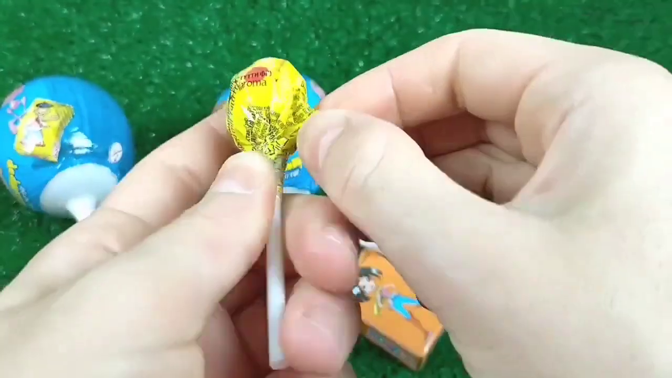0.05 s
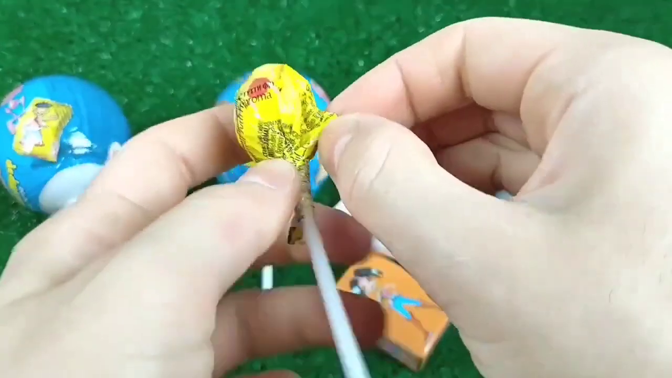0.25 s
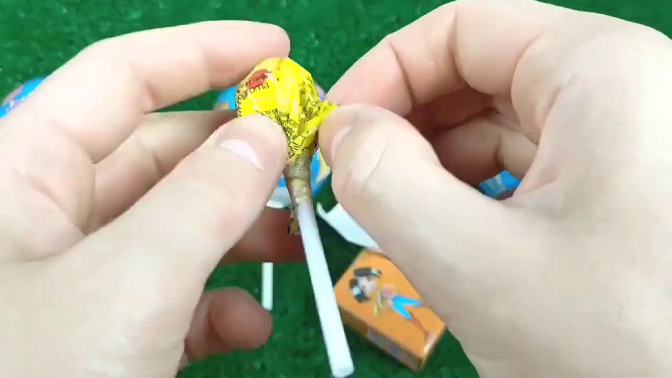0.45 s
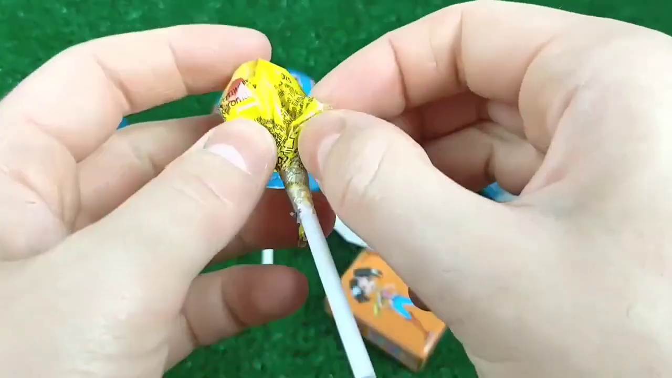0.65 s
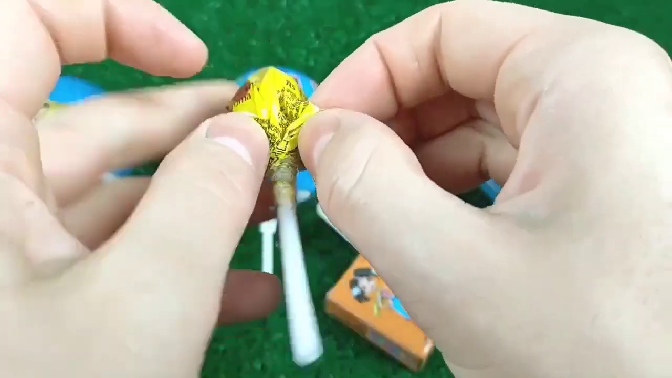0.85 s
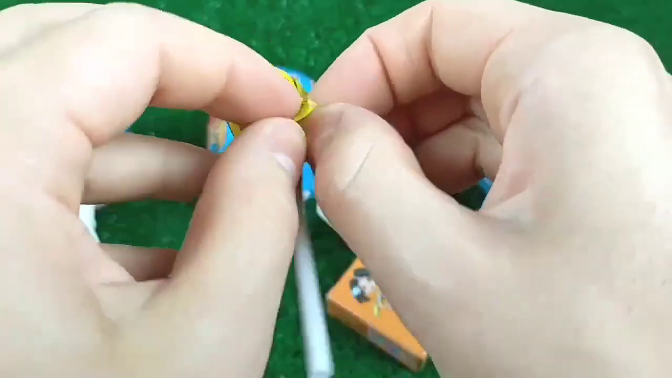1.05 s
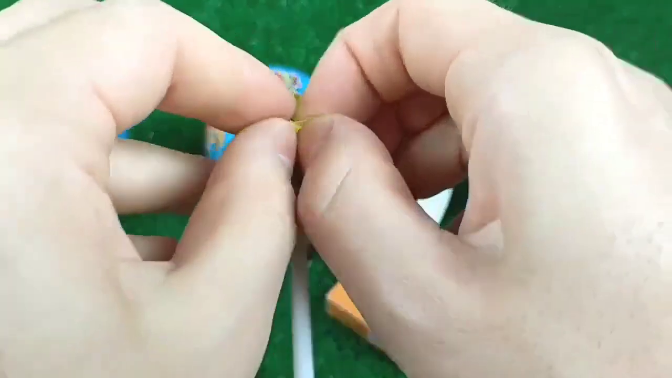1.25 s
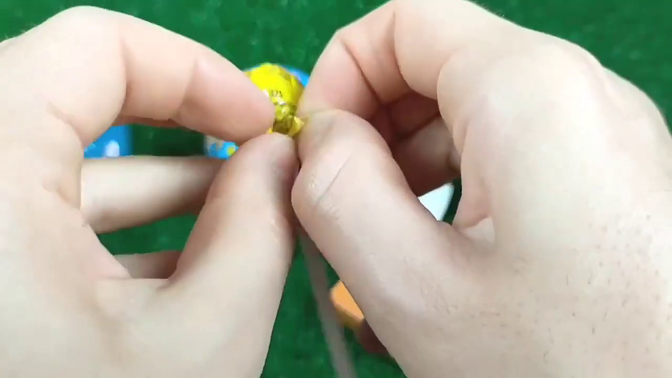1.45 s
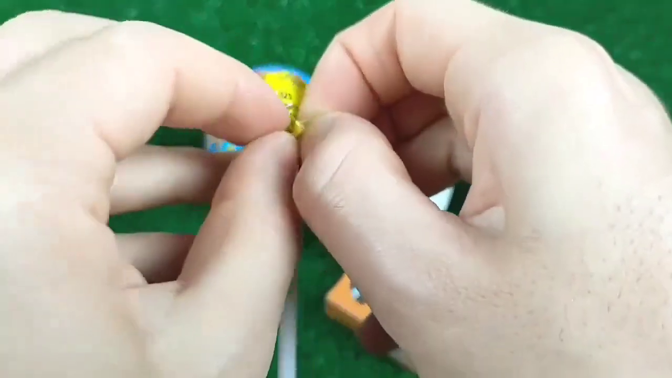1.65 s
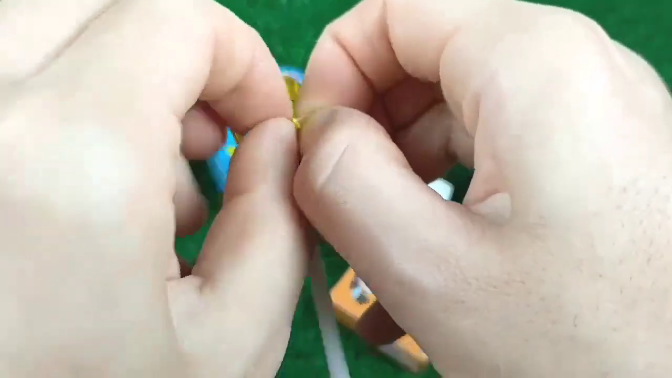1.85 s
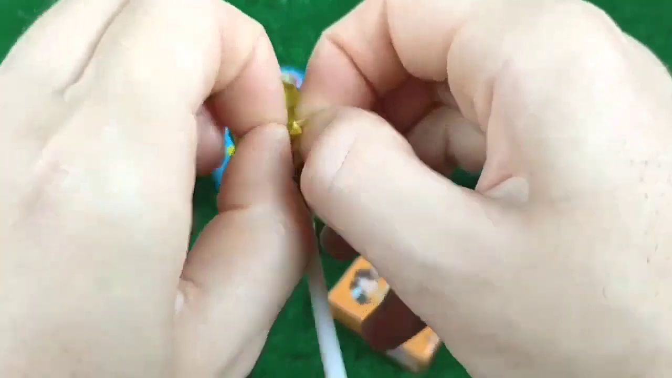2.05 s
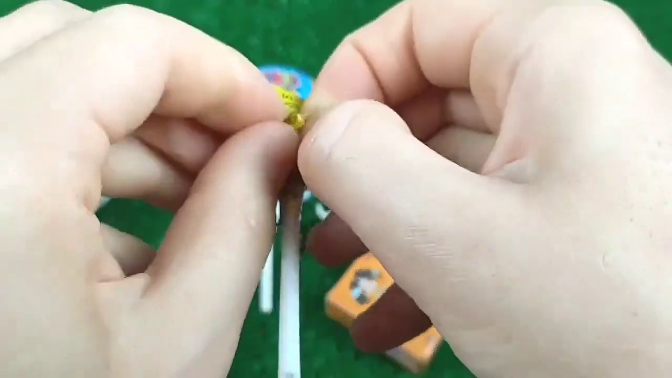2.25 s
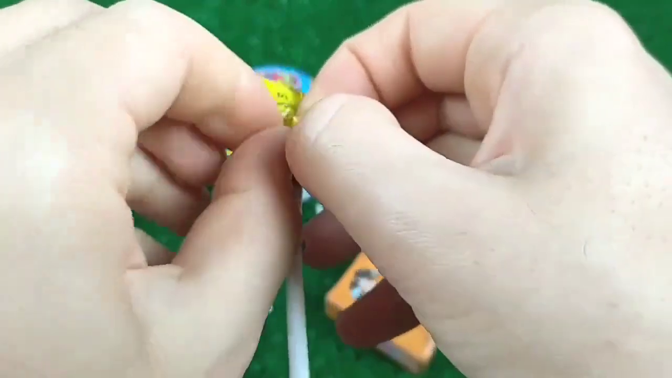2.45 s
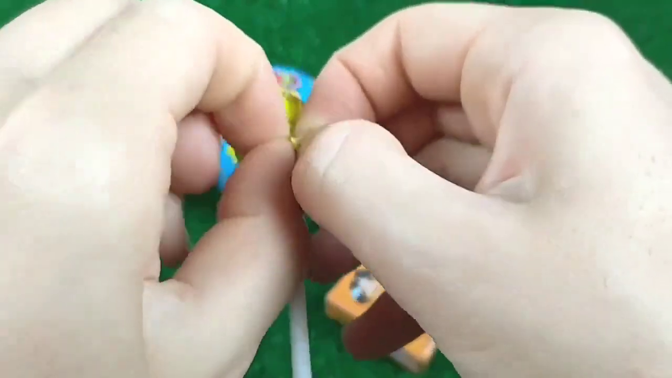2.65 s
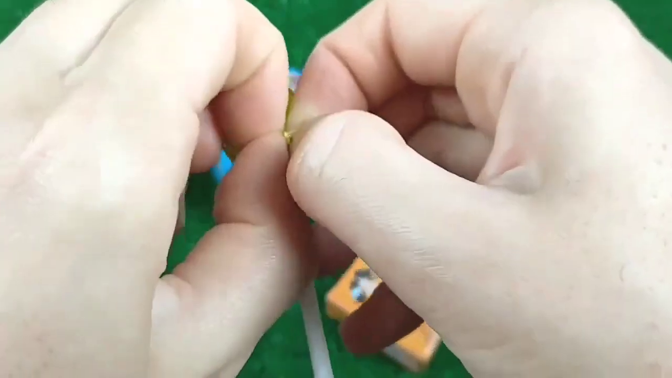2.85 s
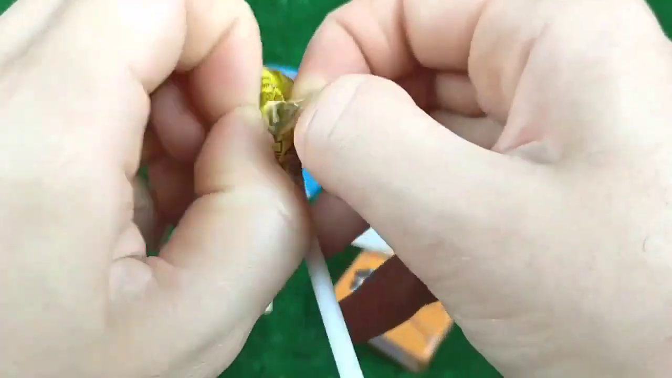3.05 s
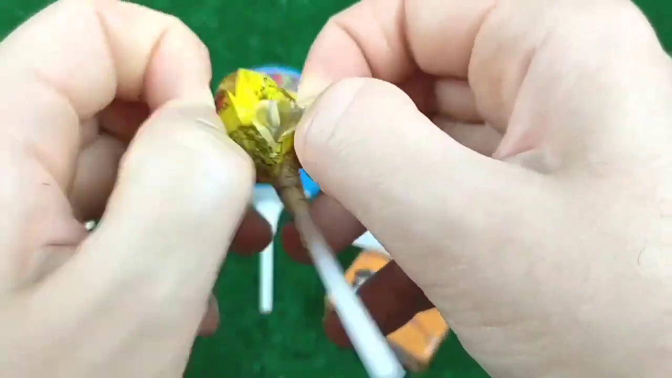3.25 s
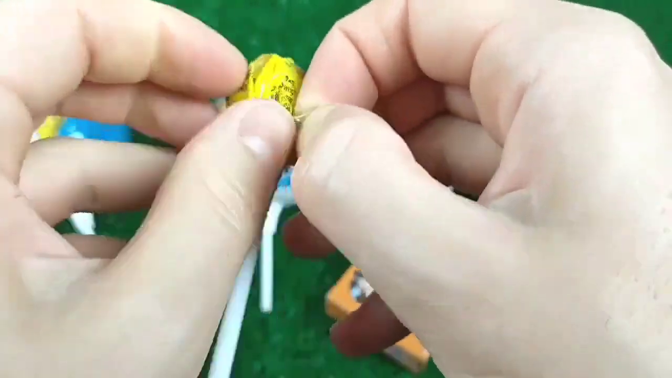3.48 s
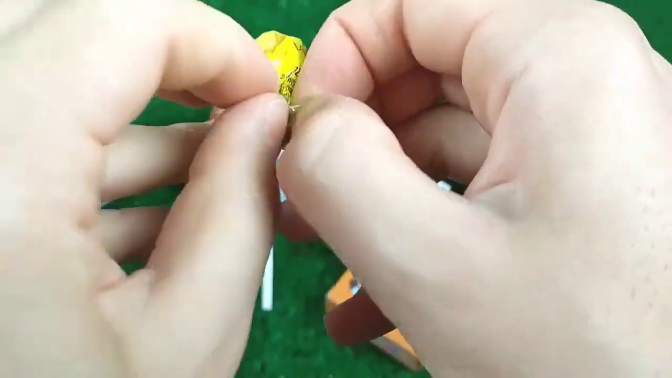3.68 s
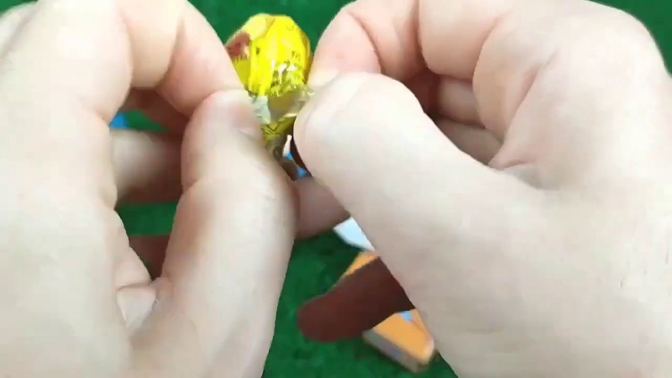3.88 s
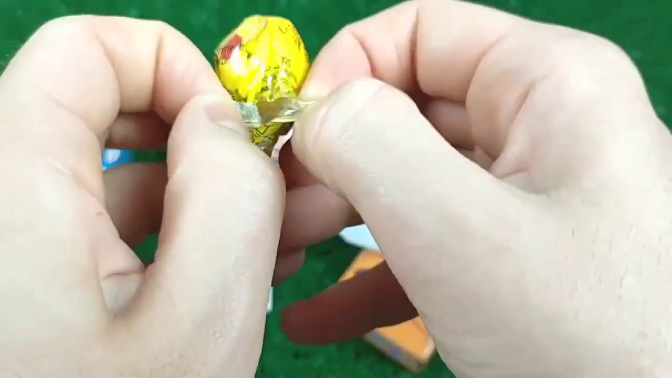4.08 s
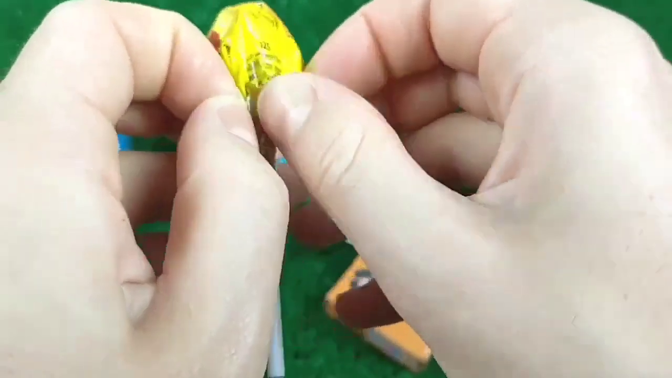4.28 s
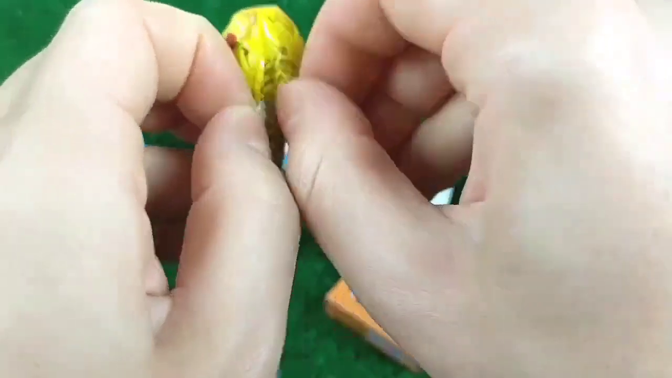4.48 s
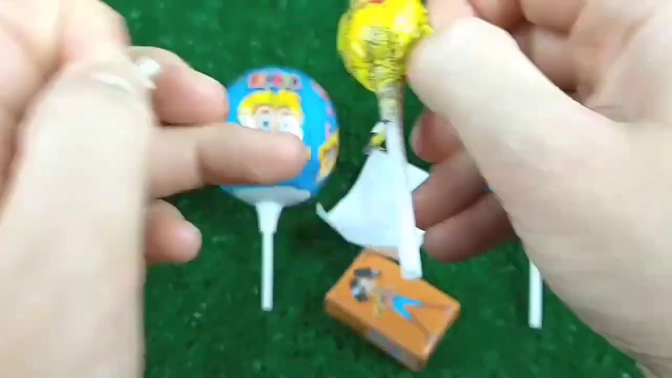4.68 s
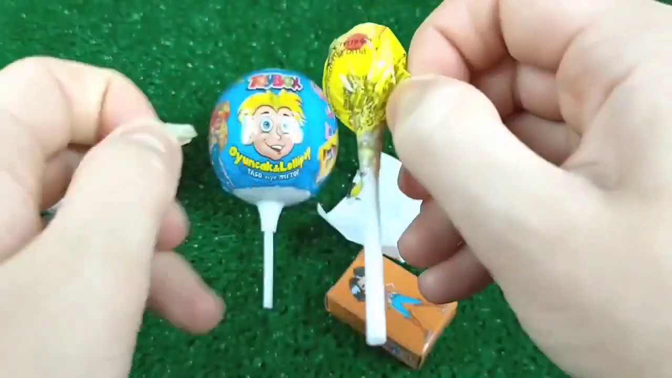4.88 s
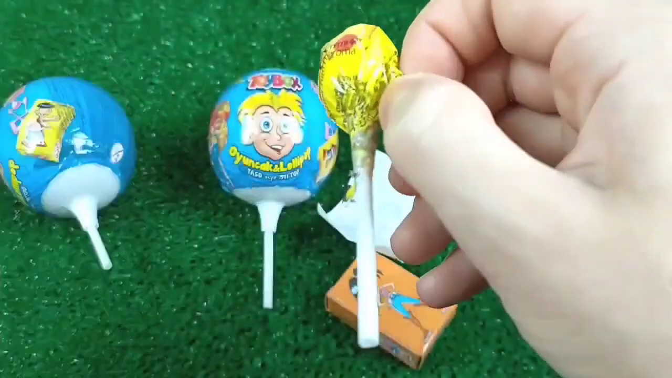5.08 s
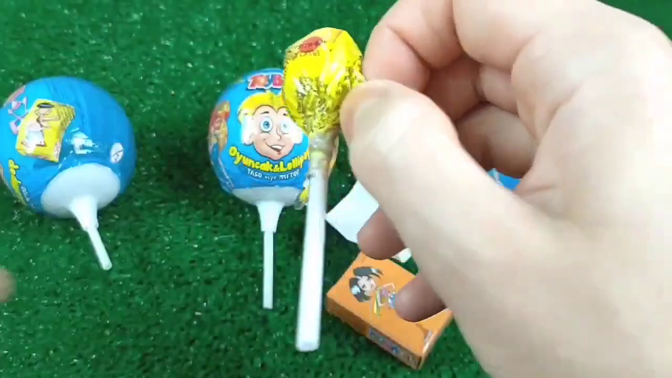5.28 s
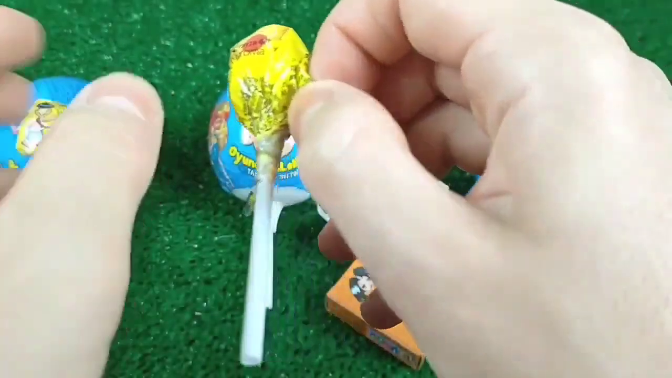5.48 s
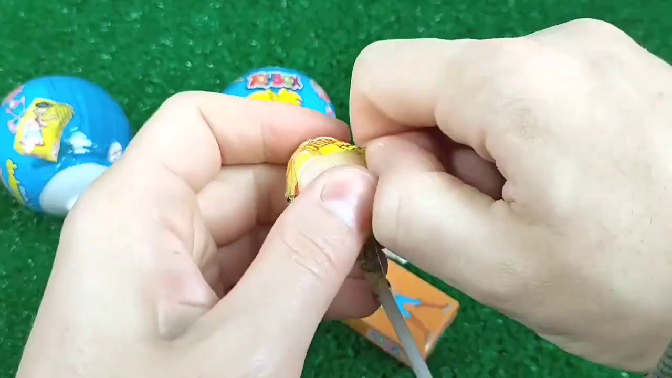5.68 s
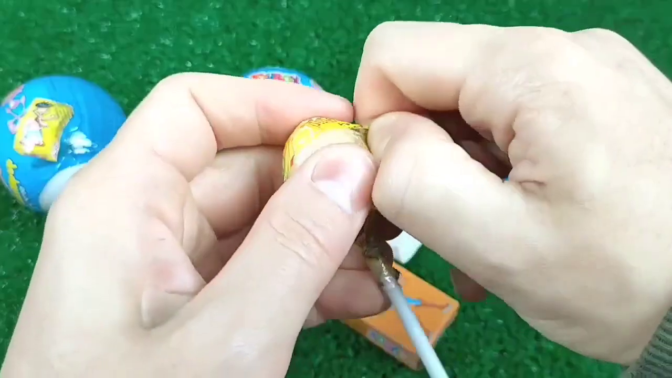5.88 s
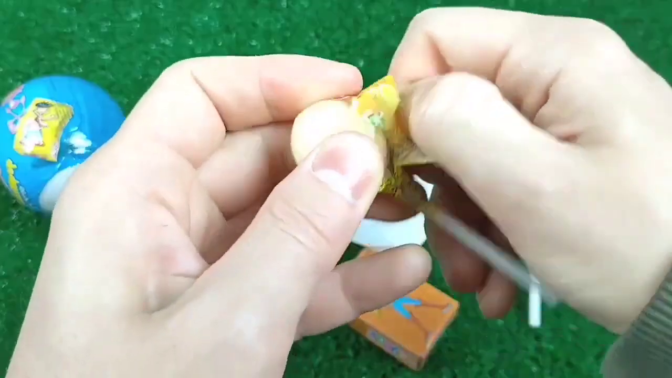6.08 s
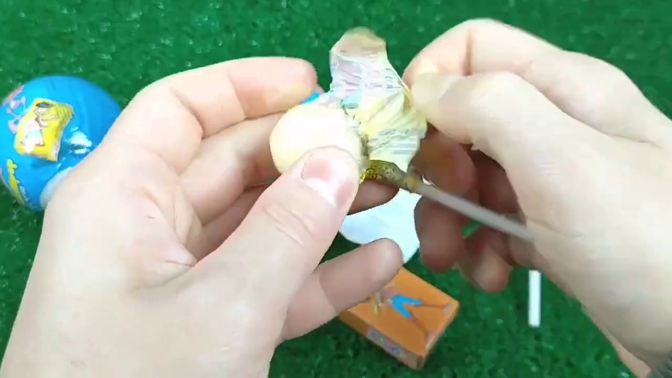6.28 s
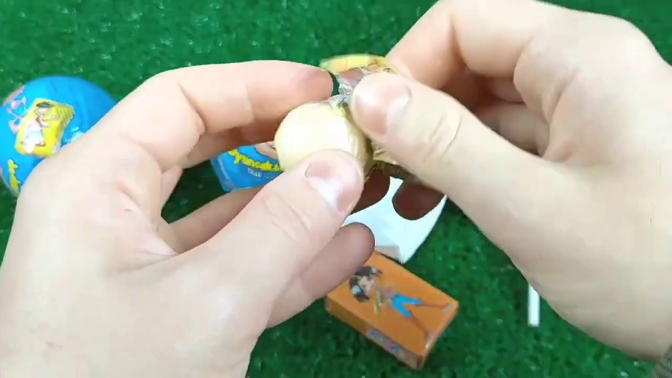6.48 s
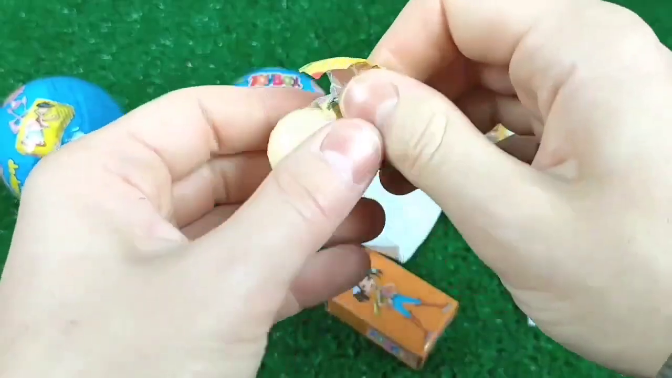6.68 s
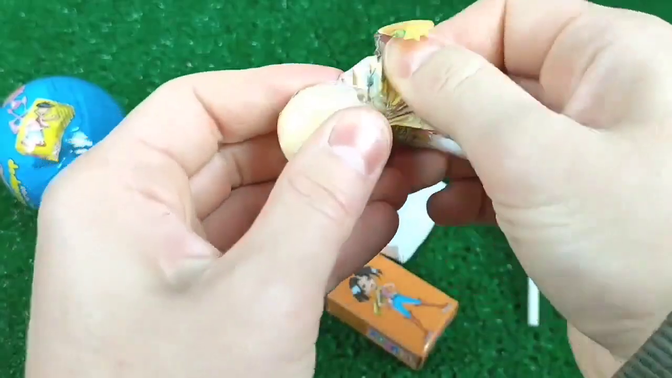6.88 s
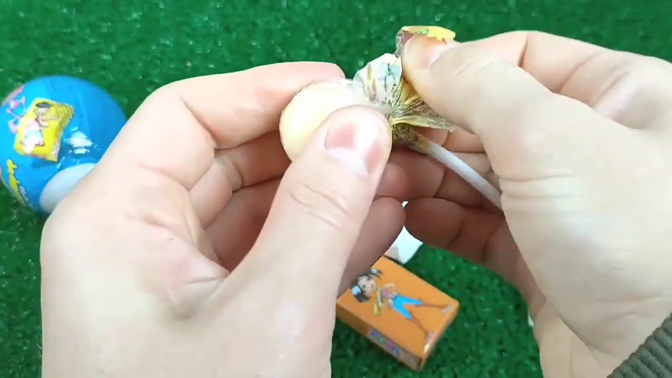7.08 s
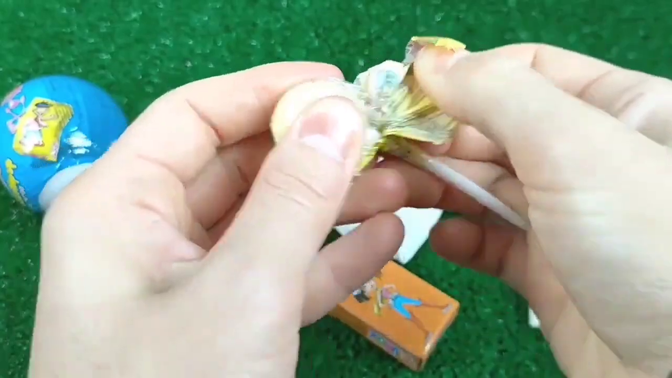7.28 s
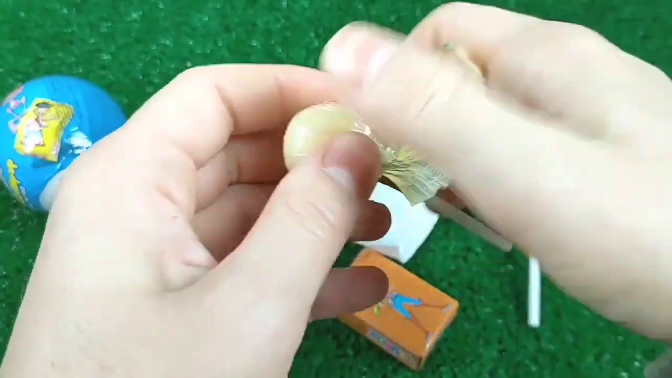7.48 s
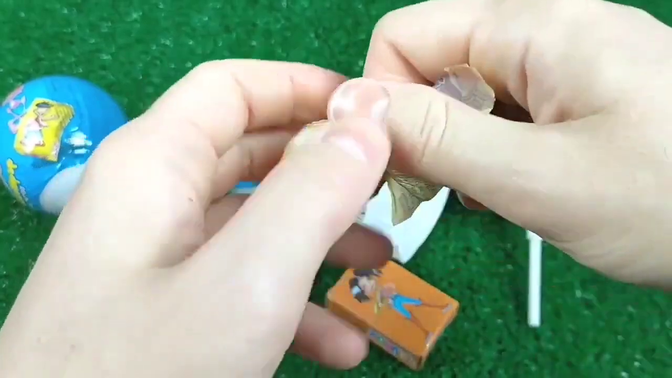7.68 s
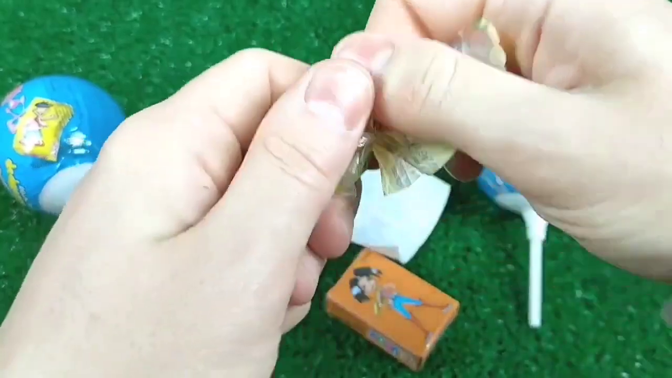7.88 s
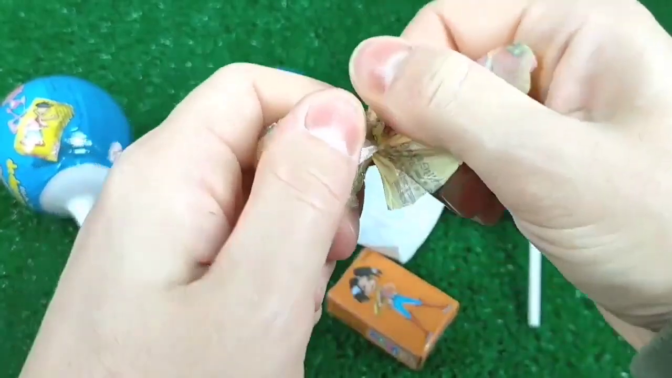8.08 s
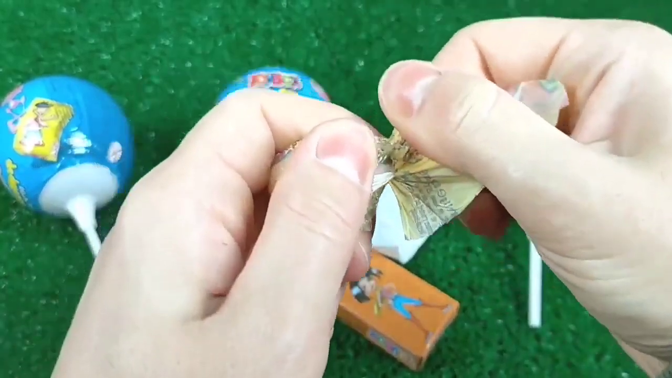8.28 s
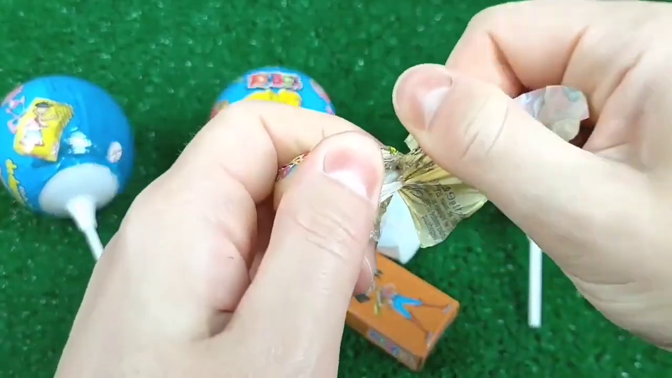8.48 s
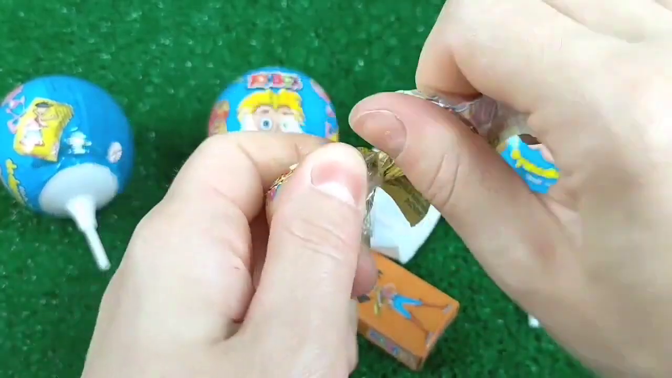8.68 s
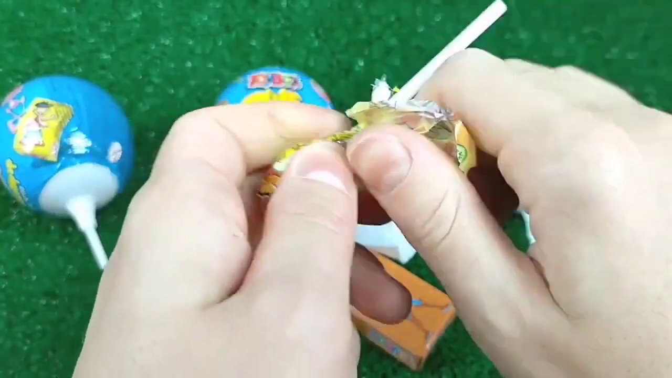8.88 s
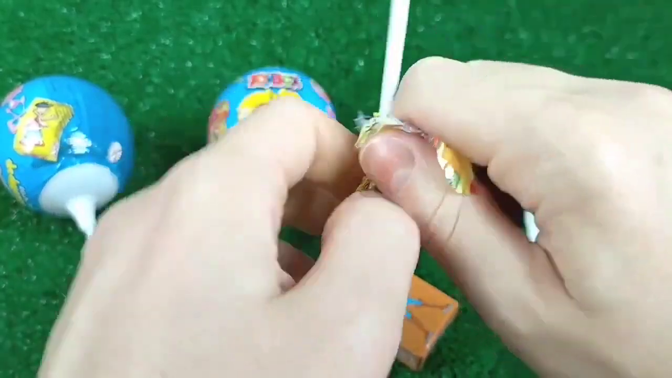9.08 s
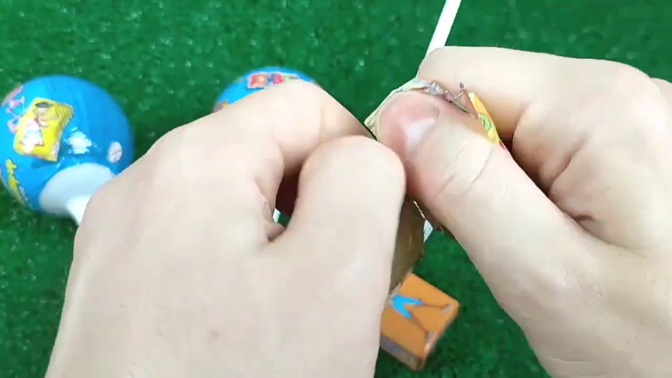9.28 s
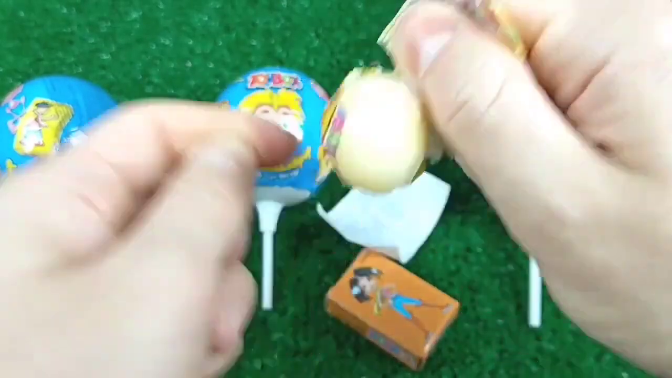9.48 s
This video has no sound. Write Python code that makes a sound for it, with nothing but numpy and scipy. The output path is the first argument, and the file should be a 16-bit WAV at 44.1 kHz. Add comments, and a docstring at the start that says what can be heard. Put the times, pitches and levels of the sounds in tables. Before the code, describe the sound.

Close to a phone microphone in a small quiet room, fingers twist and pick at a lollipop's plastic wrapper. Faint crackle and soft skin rubbing come first, with scattered dry snaps. A few hard pops break out, a near-quiet pause follows, then the film opens and crackles densely, bright and crisp, right to the end.

```python
"""A burst of fine crackle over a dull skin rub and faint room noise, then sparse snaps, dense once the film opens.
Two hands twist, pick at and peel the plastic wrapper off a lollipop, close to a phone in a small, quiet room.
Each crease is a short grain: brief noisy rise, sharp step, film rattle shaped by a facet resonance, low body.
Finger strokes swell the level of the small grains; skin rubs (coloured noise) and squeaks (wavering sines).
The hardest pops thud (decaying sines) and puff air (high-passed pushes); decaying noise bands echo the room."""
import sys
import numpy as np
from scipy import signal
from scipy.fft import rfft, irfft, next_fast_len
from scipy.io import wavfile

SR = 44100
rng = np.random.default_rng(int(sys.argv[2]) if len(sys.argv) > 2 else 0)


def log_audio(samples):
    """Write samples as a 16-bit WAV file to the path given in sys.argv[1]."""
    # one column per channel
    frames = np.atleast_2d(samples).T
    # limit to full scale, then quantise
    limited = np.clip(frames, -1, 1)
    pcm = np.round(limited * 32767).astype(np.int16)
    wavfile.write(sys.argv[1], SR, pcm)


N = 420713
TIME = np.arange(N) / SR
GRAIN, LEAD = 512, 96  # samples in a grain, samples of it before the snap


def undb(db):
    """Decibels to gain."""
    return 10 ** (np.asarray(db) / 20)


def curve(rows):
    """Gain at every sample from (t/s, level/dB) rows."""
    return undb(np.interp(TIME, *np.transpose(rows)))


def colour(points, size):
    """Gain of an (f/Hz, level/dB) spectrum on FFT bins, interpolated over log f."""
    hz, db = np.transpose(points)
    log_hz = np.log(np.fft.rfftfreq(size, 1 / SR) + 1)
    return undb(np.interp(log_hz, np.log(hz), db))


def unit(x):
    """Scale every row to unit energy."""
    return x / np.sqrt(np.sum(x ** 2, axis=-1, keepdims=True))


def causal(gain):
    """Minimum-phase spectrum: the response starts at once, then dies away."""
    cepstrum = irfft(np.log(gain))
    cepstrum[..., 1:GRAIN // 2] *= 2
    cepstrum[..., GRAIN // 2 + 1:] = 0
    return np.exp(rfft(cepstrum))


def walk(rate_hz):
    """Smooth random drift with a spread near 1, rate_hz knots per second."""
    knots = rng.standard_normal(4096)
    return np.interp(TIME * rate_hz, np.arange(len(knots)), knots)


def noise(points, shared, pan_db):
    """Coloured stereo noise of rms 1, partly common to both channels."""
    size = next_fast_len(N)
    white = rng.standard_normal((3, size))
    spectrum = rfft(white[:2] + shared * white[2]) * colour(points, size)
    x = irfft(spectrum, size)[:, :N] * undb([[pan_db / 2], [-pan_db / 2]])
    return x / x.std()


# quiet room spectrum: f/Hz, relative level/dB per Hz
QUIET_SPECTRUM = [(20, 6), (60, 5.5), (200, -18.5), (500, -24.5), (1500, -29.5), (5000, -17), (7500, -38),
                  (15000, -46.5)]


def quiet_room(rms_db=-66.5):
    """Steady coloured noise stands for the room at rest."""
    return undb(rms_db) * noise(QUIET_SPECTRUM, shared=0.48, pan_db=4.5)


# film spectrum: f/Hz, relative level/dB per Hz
FILM_SPECTRUM = [(300, -18.5), (1400, -1), (1900, -1.5), (2800, -5.5), (3900, -2), (5500, -1.5),
                 (7000, -3.5), (8200, -7), (10500, -3), (14000, -6.5), (15500, -6.5)]


def buckle(facet_hz, body_db, treble_db, body_hz=1000, body_low_hz=170):
    """One stereo grain per crease: a brief noisy rise, a sharp step, then a facet rattle; taut film also knocks."""
    treble_hz, treble_spread_db = 8000, 1.5
    rise, rise_s, rattle_s, rattle_spread = 0.49, 0.0033, 0.0016, 0.32
    sharpness, ring, ring_width, ring_above, ring_octaves = 1.535, 2.03, 0.063, 1.386, 0.54
    count = len(facet_hz)
    t = (np.arange(GRAIN) - LEAD) / SR
    hz = np.fft.rfftfreq(GRAIN, 1 / SR) + 10
    chance = rng.standard_normal((count, 3, GRAIN + 1))
    own = chance[:, :, :1]  # per-crease draws: rattle length, lag, note

    # folds face different ways: each microphone port hears its own mix
    folds = chance[:, :1, 1:] + chance[:, 1:, 1:]
    before = rise * unit(folds * (t < 0) * np.exp(-np.abs(t) / rise_s))
    decay_s = rattle_s * np.exp(rattle_spread * own[:, :1])
    after = unit(folds * (t > 0) * np.exp(-np.abs(t) / decay_s))
    step = -1. * (t == 0)

    # weak below the facet resonance, gentle fade above it
    ratio = hz / facet_hz[:, None]
    facet = ratio ** 2 / np.hypot(1 - ratio ** 2, ratio / sharpness) / np.hypot(1, ratio)
    # a neighbouring facet of chance size rings along
    note = ring_above * 2 ** (ring_octaves * own[:, 2])
    facet = facet * np.hypot(1, ring / np.hypot(1, (ratio / note - 1) / ring_width))
    # some folds break more crisply
    crisp_db = treble_db + treble_spread_db * rng.standard_normal(count)
    facet = facet * undb(crisp_db[:, None] / (1 + (treble_hz / hz) ** 4))
    film = causal(colour(FILM_SPECTRUM, GRAIN) * facet)[:, None]
    crack = unit(irfft(rfft(before + step + after) * film))

    body = hz / np.hypot(hz, body_low_hz) / np.hypot(1, (hz / body_hz) ** 2)
    knock = unit(irfft(rfft(step + after) * causal(body)))
    grains = crack + undb(body_db)[:, None, None] * knock * undb([[1.5], [-2.5]])
    # right port hears it some samples later
    lag = np.clip(6.5 + .9 * own[:, 1], 0, None)
    grains[:, 1] = irfft(rfft(grains[:, 1]) * np.exp(-2j * np.pi * hz * lag / SR))
    return grains


# where the wrapper is worked between the two ports: t/s, left minus right level/dB
SIDE = [(0, 11), (2, 5.5), (4.8, 6.5), (5.8, 4.5), (6.3, 0.5), (7.2, 7.5), (8.6, 2), (9.5, 2)]


def side_db(times, spread_db, chance):
    """Pan of creases: the working place plus a random spread."""
    return np.interp(times, *np.transpose(SIDE)) + spread_db * chance


def place(times, grains, pan_db):
    """Sum panned stereo grains on the time line."""
    first = np.clip(times * SR - LEAD, 0, N).astype(int)
    where = (first[:, None] + np.arange(GRAIN)).ravel()
    sides = np.sqrt(2) * unit(undb(np.outer(pan_db, [.5, -.5])))
    channels = [np.bincount(where, (grains[:, c] * sides[:, c, None]).ravel(), N)[:N] for c in range(2)]
    return np.array(channels)


# finger strokes; a tight twist has small, high facets, open film large, low, hollow ones:
# start t/s, length/s, fine crackle level/dB, facet resonance f/Hz, low body level/dB re crack
STROKES_ON_FILM = [(0, 0.0075, -39.5, 4800, -18), (0.38, 0.021, -53.5, 3540, -28),
                   (0.453, 0.11, -57.5, 3330, -12.5), (0.668, 0.022, -62.5, 3370, -11),
                   (1.054, 0.32, -57, 4100, -32), (1.277, 0.022, -47, 4000, -40),
                   (1.462, 0.012, -40, 4060, -39), (1.53, .18, -57.5, 4140, -17),
                   (1.888, 0.22, -56.5, 4620, -37), (2.32, 0.12, -61, 3970, -15),
                   (2.795, 0.068, -63, 3420, -14.5), (3.005, 0.49, -57, 4460, -20),
                   (3.32, 0.027, -39, 3400, -28), (3.444, 0.0083, -32, 3260, -27),
                   (3.615, 0.29, -52.5, 3870, -26), (3.966, 0.23, -50, 4250, -18),
                   (4.047, 0.018, -37, 3270, -47), (4.261, 0.17, -50, 4240, -37),
                   (4.656, 0.14, -51, 4200, -25), (4.759, 0.093, -42, 3470, -22.5),
                   (5.113, 0.015, -64, 3780, -18), (5.274, 0.018, -66, 3500, -25),
                   (5.66, 0.022, -51.5, 3450, -27), (5.699, 0.25, -55.5, 4570, -27),
                   (6.003, .12, -55.5, 4360, -27), (6.163, 0.035, -29.5, 4700, -18),
                   (6.28, 0.026, -38, 5700, -38), (6.315, 0.027, -24, 2930, -21),
                   (6.472, 0.084, -38.5, 2650, -12), (6.659, 0.033, -35, 2160, -9),
                   (6.862, 0.11, -47.5, 3250, -20), (6.989, 0.04, -21, 3830, -32.5),
                   (7.057, 0.086, -28, 3560, -33), (7.08, 0.027, -31.5, 2000, 7),
                   (7.207, 0.085, -39.5, 2680, -26), (7.453, 0.071, -35.5, 3550, -33),
                   (7.578, 0.028, -29.5, 2050, -10), (7.66, .09, -47, 3400, -16),
                   (7.758, 0.052, -32, 2860, -17), (7.815, .2, -45, 3500, -31),
                   (8.029, 0.13, -30.5, 4000, -42), (8.054, 0.03, -30.5, 2000, -2),
                   (8.165, 0.037, -34.5, 3800, -47), (8.312, 0.32, -45, 3560, -27),
                   (8.563, 0.055, -35, 3330, -25), (8.714, 0.76, -44, 3530, -21),
                   (8.935, .05, -38, 3580, -25), (9.007, 0.013, -27.5, 2340, -11.5),
                   (9.077, 0.13, -36.5, 2340, -21), (9.32, .12, -47, 3800, -30),
                   (9.5, 0.069, -27, 3430, -37)]


def crumple(t):
    """Strokes swell, hold and die away: gain, facet Hz and body dB at times t, weighted by stroke power."""
    attack_s, release_s, held_db = 0.011, 0.02, -79.5  # film held still ticks faintly
    start, length, db, hz, body_db = np.transpose(STROKES_ON_FILM)[:, :, None]
    fade = np.maximum(start - t, 0) / attack_s + np.maximum(t - start - length, 0) / release_s
    power = (undb(db) * np.exp(-fade)) ** 2 + 1e-20
    total = power.sum(axis=0)
    share = power / total
    gain = np.sqrt(total + undb(held_db) ** 2)
    return gain, (share * hz).sum(axis=0), (share * body_db).sum(axis=0)


def crackle(count=3200):
    """Small creases give way in flurries, scaled by the force crumpling the film."""
    spread_db, flurry_db, octaves, body_spread_db = 7.5, 3.5, 0.4, 5
    size, pitch, body, pan = rng.standard_normal((count, 4)).T
    times = (np.arange(count) + rng.uniform(-2, 2, count)) / count * N / SR
    flurry = np.interp(times, TIME, walk(rate_hz=60))
    sizes = undb(spread_db * np.minimum(size, 1.5) + flurry_db * flurry)
    sizes *= np.sqrt(N / np.sum(sizes ** 2))
    force, usual_hz, hollow_db = crumple(times)
    facet_hz = usual_hz * 2 ** (octaves * pitch)
    body_db = hollow_db + body_spread_db * body
    grains = buckle(facet_hz, body_db, treble_db=np.zeros(count), body_hz=1200, body_low_hz=900)
    grains = grains * (sizes * force)[:, None, None]
    return place(times, grains, side_db(times, 3, pan))


# skin rub spectrum: f/Hz, relative level/dB per Hz
SKIN_SPECTRUM = [(25, 10), (60, 0.5), (200, 0), (400, -10), (1100, -12), (2500, -15.5), (6000, -30)]
# fingers sliding on film and stick: t/s, level/dB before press, gain and drift
RUB_LEVELS = [(0.0, -60), (.9, -66), (1.3, -59.5), (1.7, -58.5), (2.7, -67), (3.37, -60), (4.36, -57.5),
              (5.05, -66), (5.6, -65.5), (5.7, -59), (6.5, -57.5), (6.82, -59.5), (8.3, -58.5), (9.54, -56)]


def fingers(gain_db=3, uneven_db=1.5, grip_db=-1.5, effort=.12):
    """Skin slides and catches: dull noise, uneven, pressed harder as the film is crumpled harder."""
    t = TIME[::LEAD]
    force = crumple(t)[0]
    press = np.interp(TIME, t, force / np.median(force)) ** effort
    drift_db = uneven_db * walk(rate_hz=40) + grip_db * walk(rate_hz=21)
    rub = noise(SKIN_SPECTRUM, shared=0.44, pan_db=-1.0)
    return rub * curve(RUB_LEVELS) * press * undb(gain_db + drift_db)


# room echo bands: f/Hz, gain/dB, t60/s
ROOM_BANDS = [(150, 7.5, 0.064), (427, -4, 0.19), (1000, -1.5, 0.2), (2000, 2.5, 0.22), (3500, 4, 0.21),
              (5950, 3, 0.2), (9000, 4.5, 0.18), (13600, 2.5, 0.18)]


def room(x, build_s=0.0013, first_s=0.00024):
    """Diffuse small-room echo: noise bands with their own decay, different at each port."""
    size = 2 ** 15
    t = np.arange(size) / SR
    hz, db, t60 = np.transpose(ROOM_BANDS)
    white = rfft(rng.standard_normal((2, size)))
    log_hz = np.log(np.fft.rfftfreq(size, 1 / SR) + 1)
    onset = 1 - np.exp(-np.maximum(t - first_s, 0) / build_s)
    echo = 0
    for band, band_db, band_t60 in zip(np.eye(len(hz)), db, t60):
        fade = unit(onset * np.exp(-np.log(1000) * t / band_t60))
        band_noise = irfft(white * np.interp(log_hz, np.log(hz), band))
        echo = echo + undb(band_db) * fade * band_noise
    return signal.fftconvolve(x[None], echo, axes=1)[:, :N]


# creases that snap out above the crackle:
# t/s, crack level/dB (rms over span_s), facet resonance f/Hz, low body level/dB re crack
LARGE_CREASES = [(0.225, -47, 3500, -25), (0.4074, -43.5, 4420, -20), (.754, -49, 2870, -17),
                 (1.0522, -43.5, 2490, -28), (1.0886, -42, 3200, -33), (1.161, -34.5, 4550, -38),
                 (1.2197, -36.5, 4300, -43), (1.2893, -30, 3800, -40), (1.3706, -43, 5030, -17),
                 (1.4732, -27.5, 3500, -38), (1.6116, -41, 4570, -23), (1.636, -36.5, 4100, -35),
                 (1.6909, -33.5, 4170, -23), (1.8186, -37.5, 4370, -42), (1.854, -42, 5170, -31),
                 (2.0153, -41.5, 5440, -38), (2.1558, -44.5, 5800, -18), (2.2936, -44, 5130, -40),
                 (2.38, -41, 4200, -19), (2.818, -38, 2860, -21), (3.005, -32, 6200, -35),
                 (3.0645, -43, 5670, -30), (3.1497, -40.5, 4770, -30), (3.19, -31.5, 4800, -30),
                 (3.2512, -33.5, 3900, -41), (3.2619, -25, 2800, -17.5), (3.306, -27, 2330, -14),
                 (3.418, -41, 5100, -17), (3.4403, -12.5, 2900, -13), (3.6063, -35, 2630, -6.5),
                 (3.6268, -33, 2390, -13), (3.6468, -28, 2750, -21), (3.6712, -34, 4100, -17.5),
                 (3.735, -41.5, 5670, -30), (3.773, -30, 3350, -31), (3.8054, -35, 2840, -30),
                 (3.9645, -35.5, 4400, -17), (3.987, -31.5, 4950, -47), (4.0006, -32, 4100, -41),
                 (4.042, -23, 7600, -49), (4.057, -18.5, 3770, -49), (4.0638, -26.5, 3260, -43),
                 (4.1379, -25, 2380, -24.5), (4.1838, -35.5, 4040, -27), (4.2956, -35.5, 3700, -30),
                 (4.3478, -31, 5530, -36), (4.4046, -28.5, 3450, -17), (4.4433, -35, 6140, -26),
                 (4.6622, -33, 4550, -19), (4.788, -9.5, 2980, -14), (5.095, -51, 4840, -31),
                 (5.1258, -47.5, 3500, -29), (5.2918, -52, 3500, -26), (5.4033, -55.5, 3200, -24),
                 (5.5177, -54.5, 3500, -18.5), (5.6496, -27, 4580, -42), (5.7173, -32, 4820, -28),
                 (5.8524, -34.5, 2180, -12), (5.8789, -34.5, 4900, -32), (5.9017, -32.5, 9000, -40),
                 (6.0899, -25, 2380, -13.5), (6.1567, -6, 3500, -22), (6.2195, -27, 2700, -8.5),
                 (6.2659, -23, 3300, -25), (6.3249, -16.5, 3170, -49), (6.3322, -11, 2850, -55),
                 (6.4874, -20, 3360, -32), (6.492, -19, 2850, -26.5), (6.4948, -23, 3000, -21.5),
                 (6.582, -18.5, 3950, -26), (6.6907, -24, 2360, -36), (6.746, -31.5, 2970, -22),
                 (6.884, -27, 2600, -30), (6.9094, -32, 2970, -14), (6.9519, -18, 3650, -38),
                 (6.986, -15.5, 3970, -27.5), (7.0095, -10.5, 3940, -42), (7.0272, -14, 3460, -36),
                 (7.0936, -20.5, 2680, -43), (7.1338, -16.5, 2250, -6.5), (7.164, -22.5, 3760, -41),
                 (7.2376, -25, 4000, -47), (7.2807, -26.5, 2560, -33), (7.3614, -27.5, 3500, -16),
                 (7.379, -20.5, 3500, -31), (7.4495, -16, 2970, -19.5), (7.5333, -32.5, 3140, -12),
                 (7.6016, -20, 2000, -12.5), (7.7844, -23.5, 3500, -18), (7.8138, -16.5, 3130, -17),
                 (8.0494, -19, 5100, -40), (8.074, -19, 3850, -19.5), (8.0847, -15, 3830, -44),
                 (8.146, -20, 4800, -52), (8.1528, -16.5, 3700, -50), (8.2499, -13.5, 2830, -24.5),
                 (8.3336, -27, 3580, -45), (8.4542, -30, 3470, -22), (8.5274, -27.5, 2210, -13),
                 (8.542, -29, 3650, -24), (8.5733, -10, 4300, -10), (8.6123, -30, 3930, -28),
                 (8.717, -37, 4500, -29), (8.7536, -24, 3770, -22.5), (8.812, -30, 2800, -15.5),
                 (8.8548, -30.5, 3700, -20), (9.018, -18, 2800, -9.5), (9.1, -29, 2850, -21),
                 (9.1565, -30.5, 2060, -30), (9.2097, -25.5, 2150, -31), (9.3152, -29.5, 4100, -44),
                 (9.35, -26.5, 5230, -38), (9.396, -28.5, 4270, -21.5), (9.4844, -20, 3500, -32),
                 (9.491, -11, 2980, -49)]


def snaps(span_s=0.0057, echo_db=-15, treble_db_per_db=0.09, usual_db=-26):
    """Large creases, brighter the harder they snap; returns near sound and mono room send."""
    s, db, facet_hz, body_db = np.transpose(LARGE_CREASES)
    grains = buckle(facet_hz, body_db, treble_db_per_db * (db - usual_db))
    grains = grains * (undb(db) * np.sqrt(span_s * SR))[:, None, None]
    pan_db = side_db(s, 1.0, rng.standard_normal(len(s)))
    sent = undb(echo_db) * place(s, grains, np.zeros(len(s)))[0]
    return place(s, grains, pan_db), sent


# skin dragging on the film: middle t/s, half-width/s (to 1/e^2), mean pitch f/Hz, level/dB before grip
SKIN_SQUEAKS = [(0.585, 0.035, 1000, -65), (1.369, 0.049, 842, -59.5), (1.65, .06, 1035, -65),
                (1.733, 0.041, 1170, -67), (4.342, 0.036, 390, -57.5)]


def squeaks():
    """Stick and slip briefly falls into a tone of wavering pitch and broken level."""
    out = 0
    for s, length, hz, db in SKIN_SQUEAKS:
        phase = 2 * np.pi * np.cumsum(hz * (1 + .04 * walk(rate_hz=220))) / SR
        grip_db = 4 * walk(rate_hz=90) - 2
        swell = np.exp(-2 * ((TIME - s) / length) ** 2)
        out = out + np.sqrt(2) * undb(db + grip_db) * swell * np.sin(phase)
    return out


# pops that push air at the microphone: t/s, push peak level/dB before the bass cut, push decay/s
AIR_PUSHES = [(3.4404, -22.5, 0.0025), (4.7868, -12.5, 0.025), (6.159, -27, 0.014), (7.1334, -14, 0.0011),
              (8.5735, -10, 0.025)]


def puffs(port_hz=22, right_db=-14):
    """A pop shoves air, mostly at the left port; the microphone's bass cut swings back slowly."""
    push = 0
    for s, db, length in AIR_PUSHES:
        push = push - undb(db) * (TIME > s) * np.exp(-np.abs(TIME - s) / length)
    bass_cut = signal.butter(4, port_hz, "high", fs=SR, output="sos")
    swing = signal.sosfilt(bass_cut, push + 1e-18)
    return swing * undb([[0], [right_db]])


# film lets go and a fingertip knocks on the candy: t/s, envelope start level/dB (left), f/Hz
CANDY_KNOCKS = [(4.7878, -25.5, 607), (6.156, -13, 330)]


def knocks(decay_s=0.0016, right_db=-6):
    """Short, dull thuds: sines damped at once by the fingers."""
    out = 0
    for s, db, hz in CANDY_KNOCKS:
        age = np.maximum(TIME - s, 0)
        out = out - undb(db) * np.exp(-age / decay_s) * np.sin(2 * np.pi * hz * age)
    return out * undb([[0], [right_db]])


def scene(crackle_room_db=-5):
    """Wrapper and fingers close by, their creases' echo, and the quiet of the room."""
    near, sent = snaps()
    fine = crackle()
    echo = room(sent + undb(crackle_room_db) * fine[0])
    film = near + fine + echo
    hands = fingers() + squeaks() + knocks()
    return film + hands + puffs() + quiet_room()


def record(dry, limit=.75, top_hz=15800):
    """Peaks are clipped at the limit, then a steep low-pass removes the top."""
    low_pass = signal.ellip(10, .2, 90, top_hz, fs=SR, output="sos")
    return signal.sosfilt(low_pass, np.clip(dry, -limit, limit))


dry = scene()
out = record(dry)
log_audio(out)
```